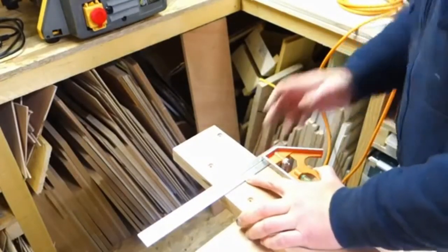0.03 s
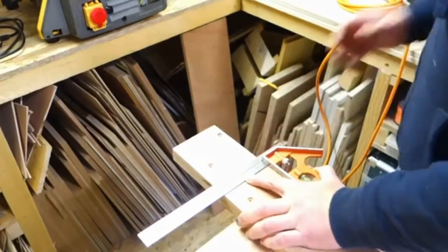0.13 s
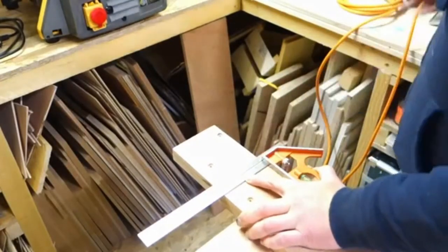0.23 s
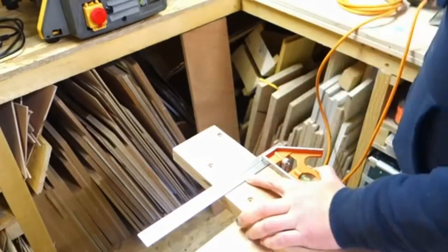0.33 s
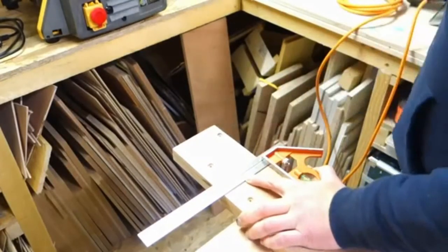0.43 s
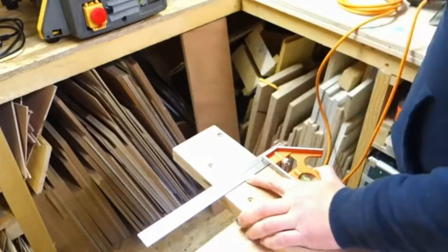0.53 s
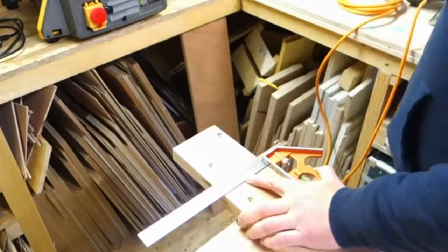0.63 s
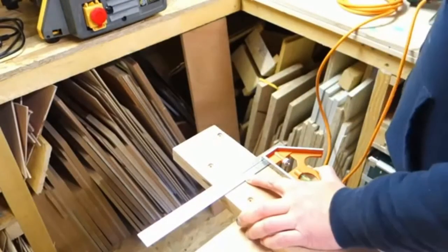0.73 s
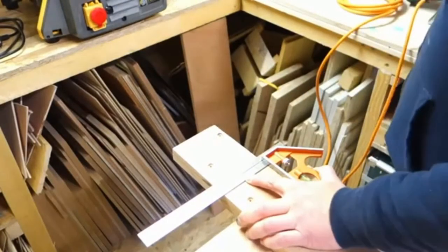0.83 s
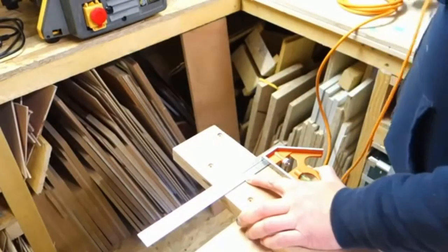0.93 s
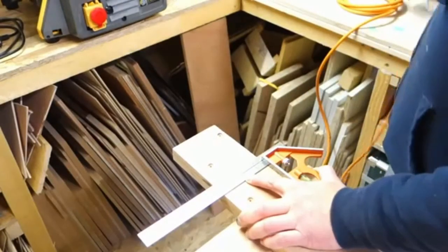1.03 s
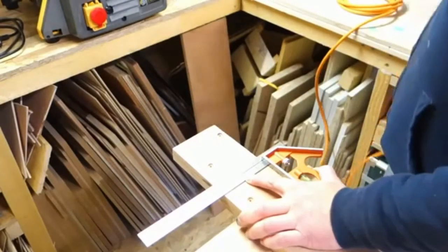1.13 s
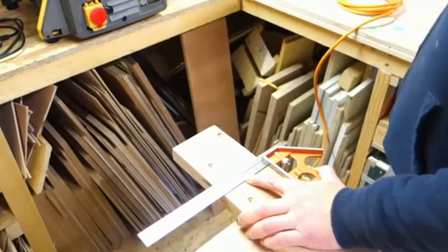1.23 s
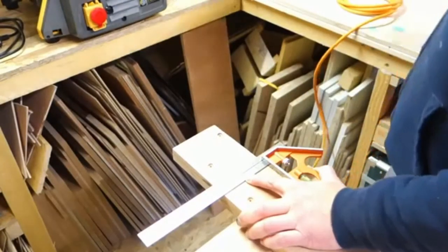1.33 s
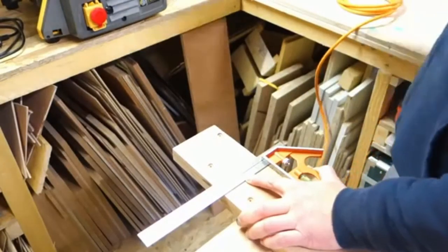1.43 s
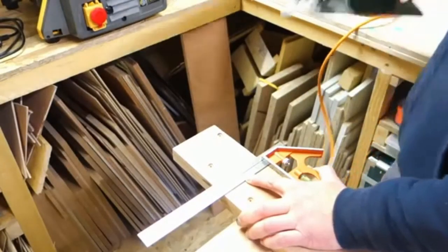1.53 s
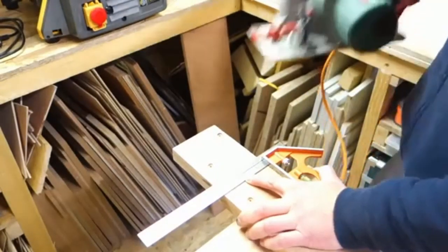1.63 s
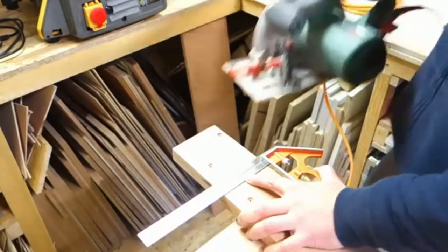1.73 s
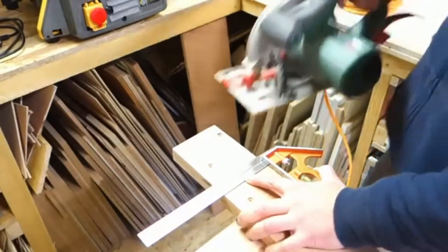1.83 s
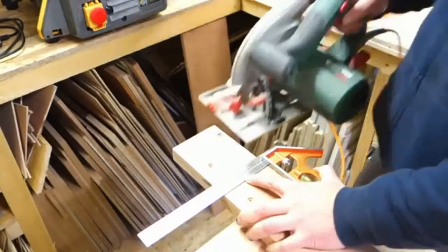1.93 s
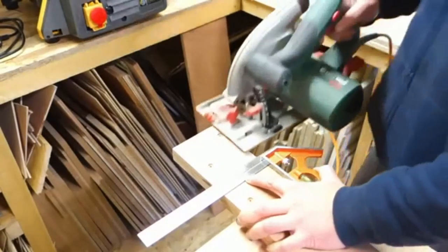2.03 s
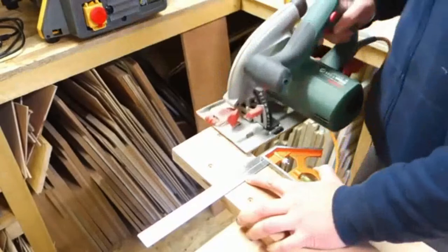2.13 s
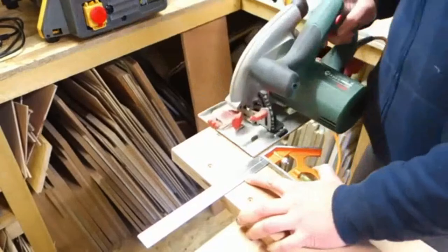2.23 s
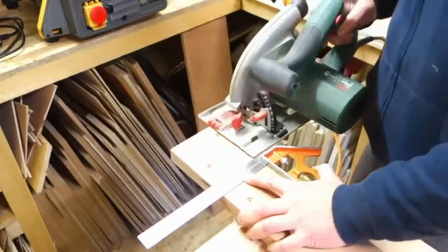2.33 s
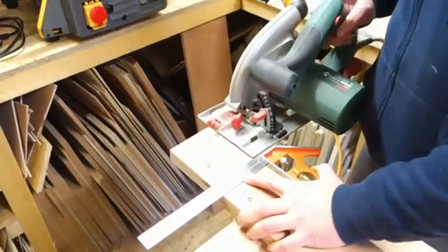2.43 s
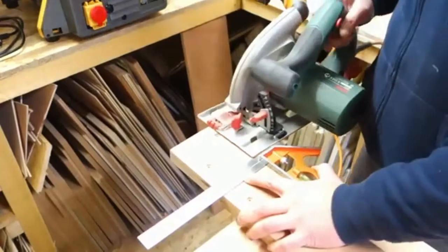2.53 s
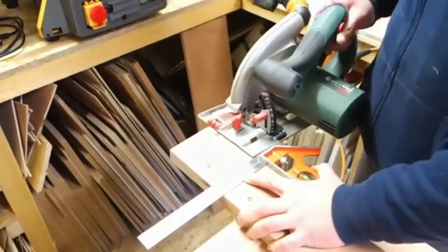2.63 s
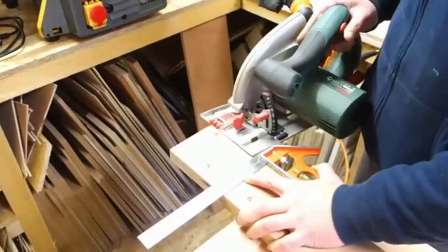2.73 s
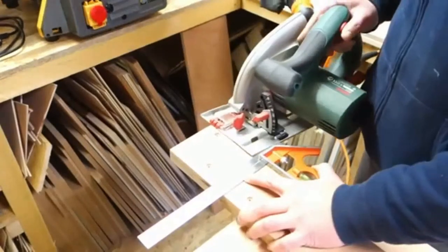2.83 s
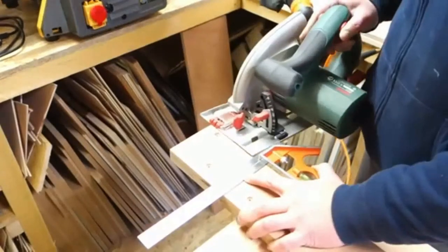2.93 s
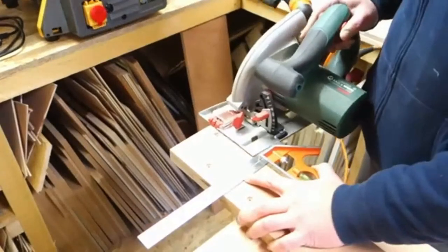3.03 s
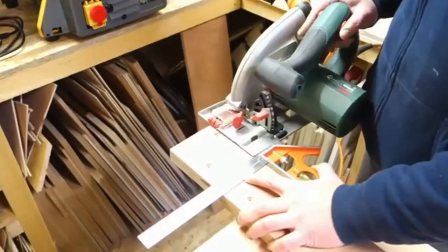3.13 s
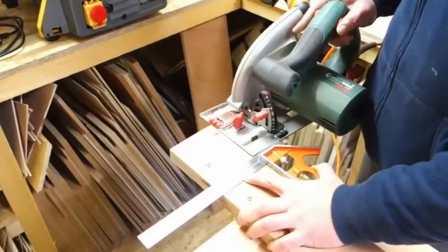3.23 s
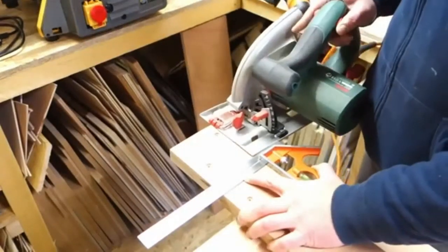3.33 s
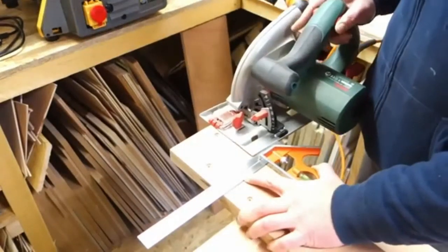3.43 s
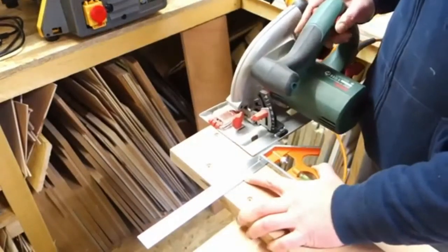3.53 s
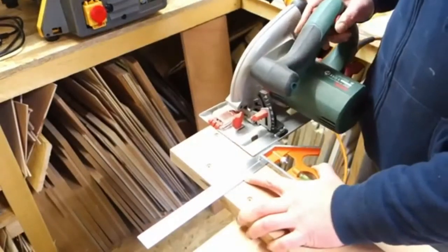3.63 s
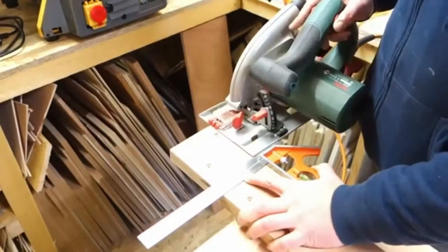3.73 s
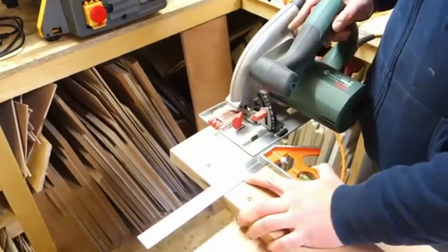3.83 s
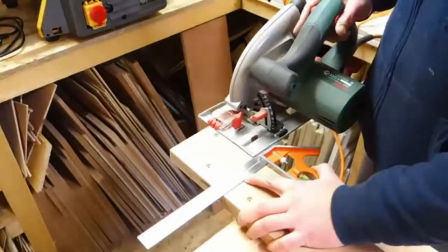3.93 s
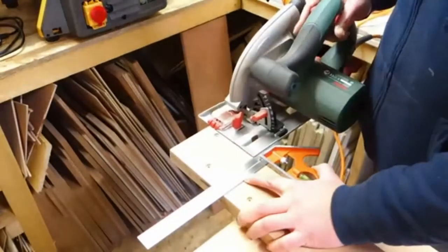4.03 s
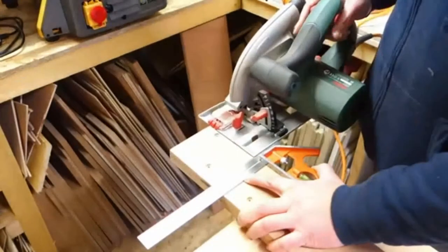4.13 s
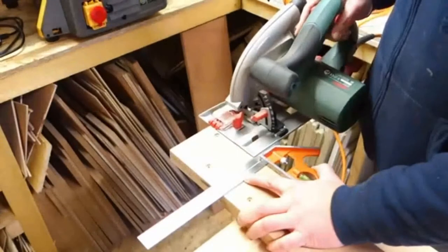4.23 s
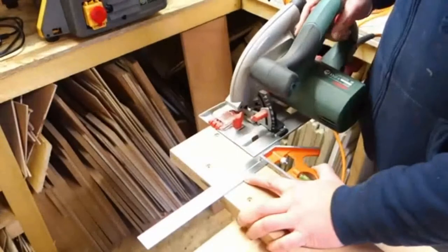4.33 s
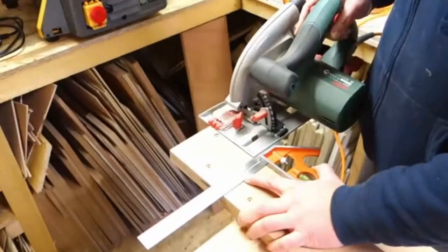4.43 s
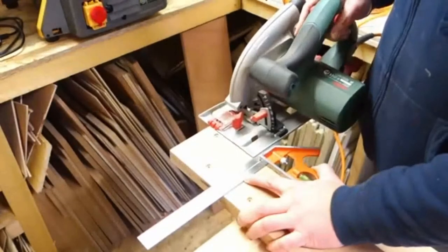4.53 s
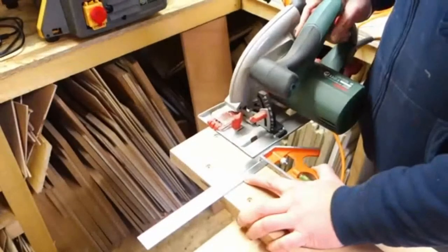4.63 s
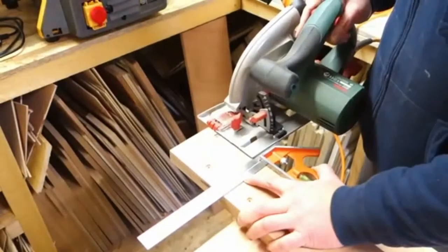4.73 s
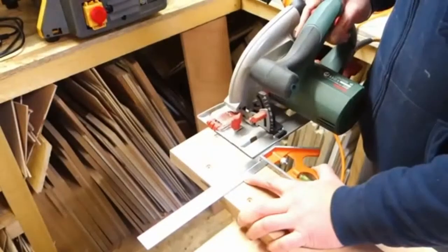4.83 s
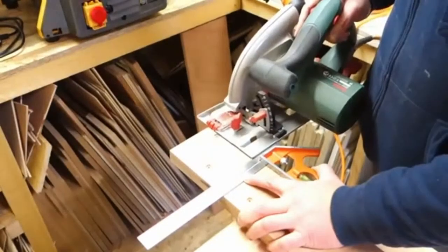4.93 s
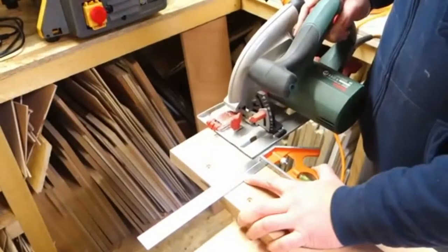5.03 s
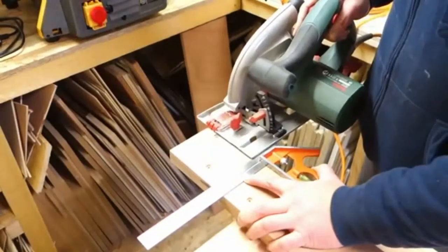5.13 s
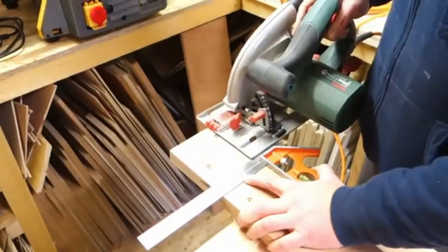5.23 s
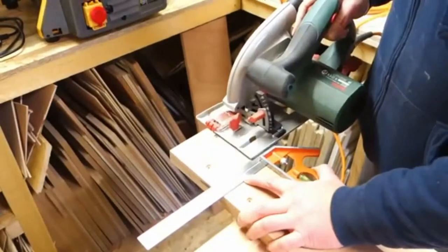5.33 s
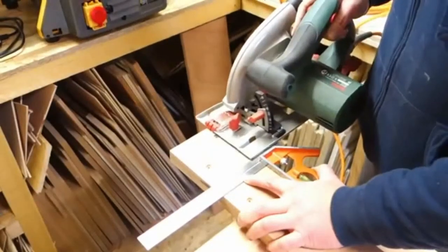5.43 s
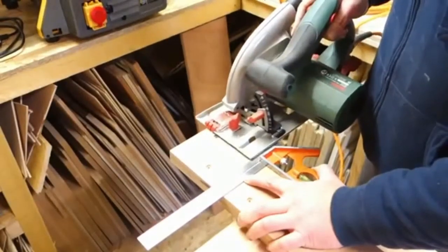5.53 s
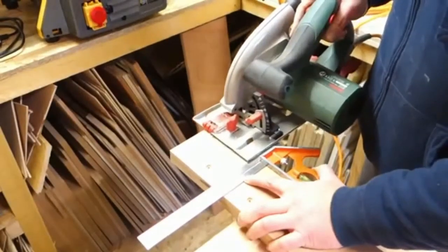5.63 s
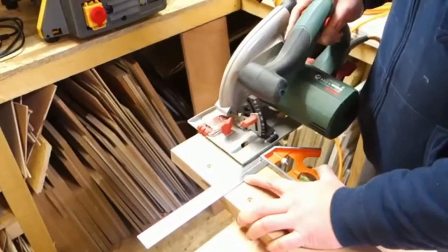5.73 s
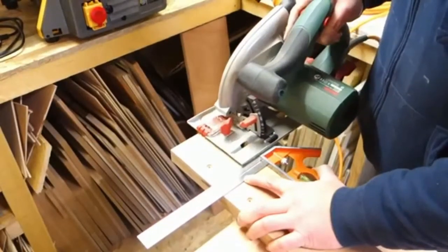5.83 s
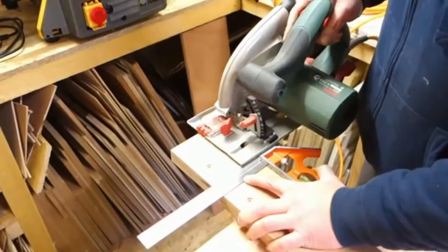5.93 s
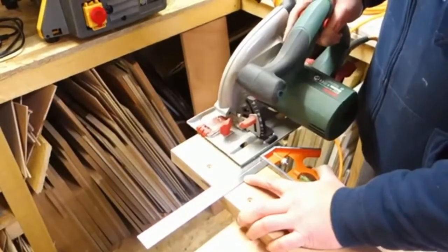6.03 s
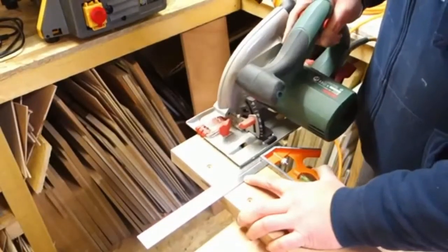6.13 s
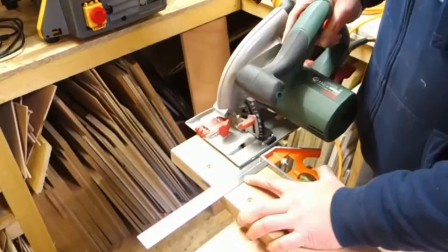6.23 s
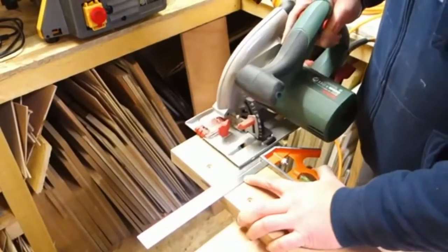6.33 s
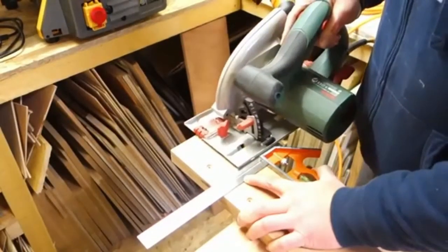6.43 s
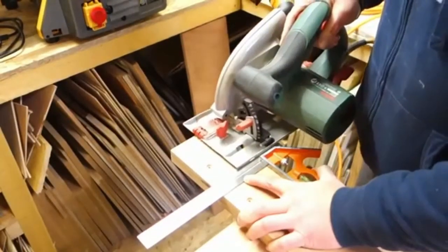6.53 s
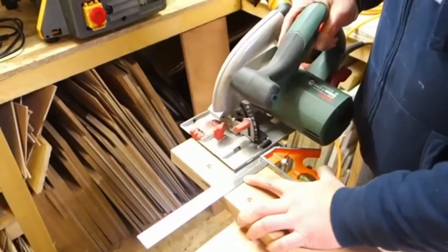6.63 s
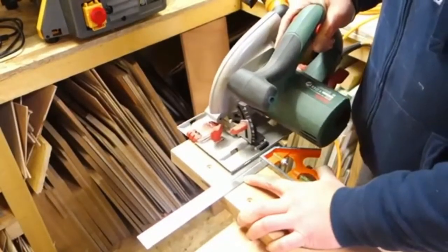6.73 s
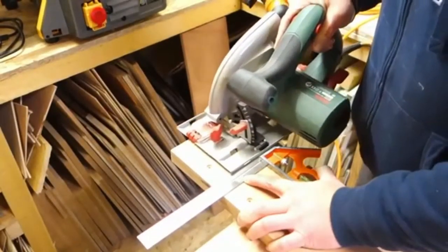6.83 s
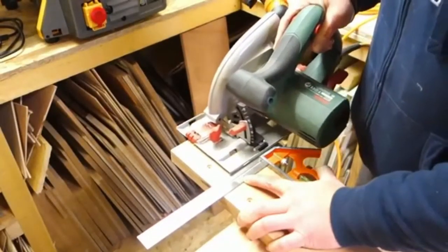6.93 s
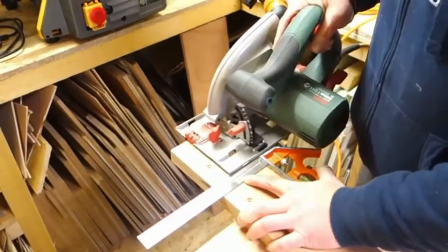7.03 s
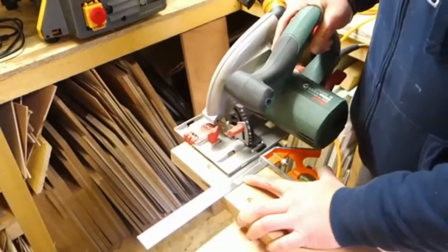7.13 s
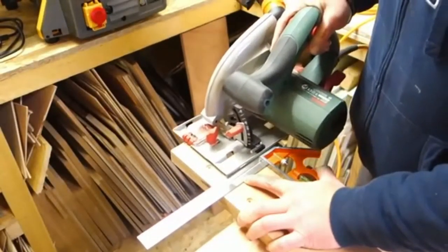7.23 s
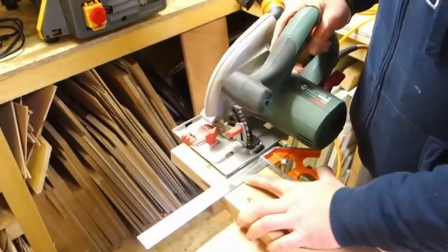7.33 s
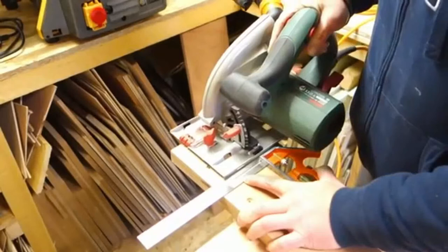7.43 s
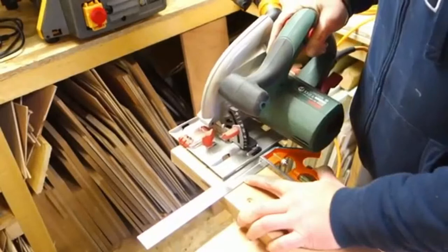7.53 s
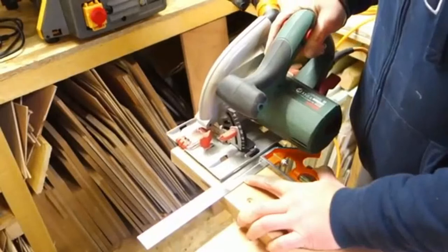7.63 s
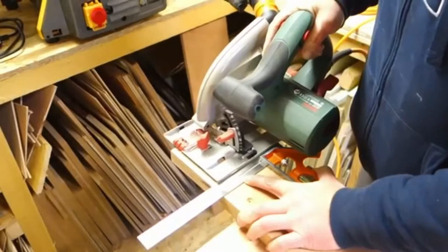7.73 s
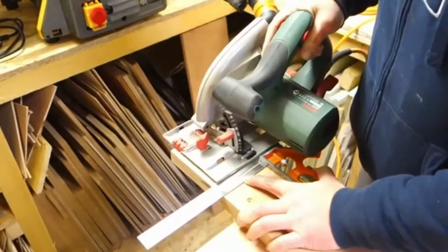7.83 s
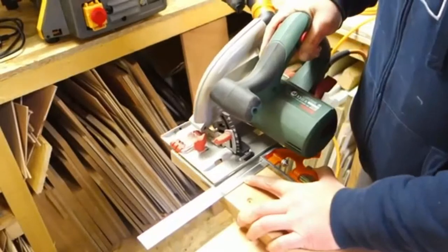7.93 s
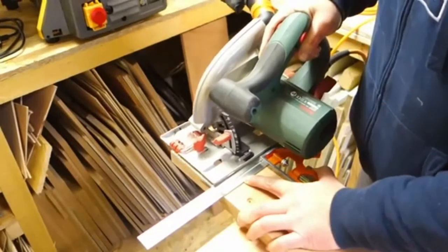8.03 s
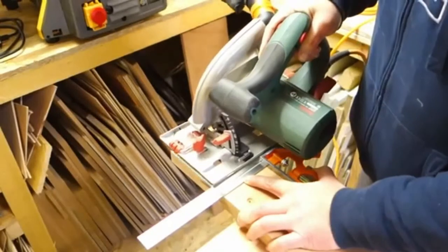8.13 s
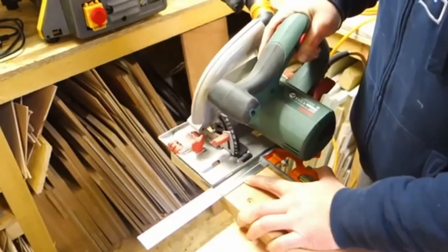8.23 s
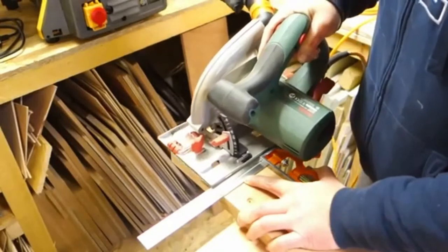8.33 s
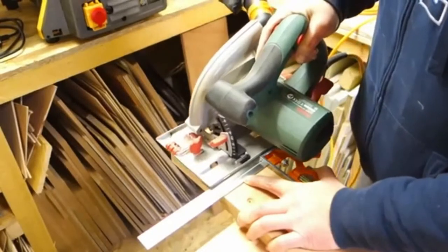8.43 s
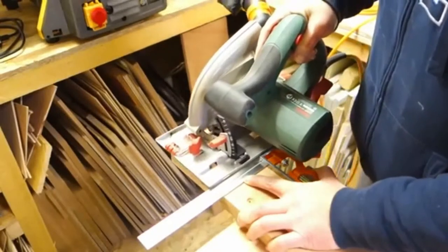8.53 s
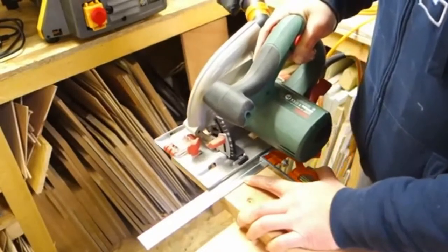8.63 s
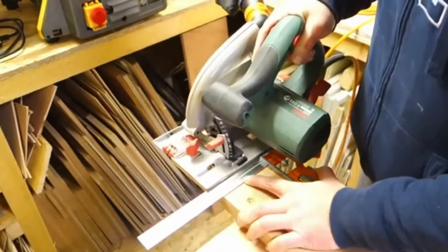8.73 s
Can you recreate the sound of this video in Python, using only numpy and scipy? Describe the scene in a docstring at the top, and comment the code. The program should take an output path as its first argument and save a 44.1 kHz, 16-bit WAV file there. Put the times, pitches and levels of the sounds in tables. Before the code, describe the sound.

Light knocks and rustling as a circular saw is positioned, then it starts abruptly, whines up to speed and cuts wood loudly.

```python
"""In a small workshop a handheld circular saw is picked up, knocked against the bench and set on a board.
Each impact rings the bench's modes, sleeves and cable rustle by friction, and the mount of a two-port
microphone passes on the low shaking. At 3.9 s the motor starts with a jerk and a mains buzz; loose gear
teeth rattle under the torque. As the rotor gathers speed these fade, the gear whine climbs through
the resonances of its case, and fan air and blade teeth roar to the end."""
import sys
import numpy as np
from scipy import signal
from scipy.fft import rfft, irfft
from scipy.io import wavfile
from scipy.ndimage import uniform_filter1d

SR = 44100
rng = np.random.default_rng(int(sys.argv[2]) if len(sys.argv) > 2 else 0)


def generate_wav(sig):
    """Save sig (samples, or channels by samples) to the path in sys.argv[1] as 16-bit PCM at SR."""
    pcm = np.round(np.clip(np.atleast_2d(sig).T, -1, 1) * 32767).astype(np.int16)
    wavfile.write(sys.argv[1], SR, pcm)


N = 388080
TIME = np.arange(N) / SR
FRAMES = np.arange(N // 512 + 5) * 512 / SR  # t/s of the short-time spectra
BINS = np.fft.rfftfreq(2048, 1 / SR)  # their f/Hz


START_S, TOP_HZ = 3.918, 503.5  # trigger time; rotation rate at full speed
# quick and slow stage of the run-up: share of full speed, time constant/s
RUN_UP_STAGES = [(.459, .186), (.428, .599)]
def speed(t=TIME):
    """Exponential approach: the rotor's speed as a share of full speed."""
    return 1 - sum(share * np.exp(-np.maximum(t - START_S, 0) / lag) for share, lag in RUN_UP_STAGES)


# spectrum of the roar: f/Hz, level/dB
ROAR_SPECTRUM = [(30, -28.5), (201, -23.5), (245, -13.5), (330, -18.5), (489, -6.5), (822, -6.5),
                 (1250, -6), (2760, -10), (6080, -11), (11000, -16)]
# peaks and dips of guard and vents: f/Hz, width/Hz, gain/dB
GUARD_RESONANCES = [(420, 40, 4), (640, 50, 3), (712, 60, 8), (820, 60, -5), (920, 40, 2), (1005, 40, 2),
                    (1230, 50, 7.5), (1410, 50, 7.5), (1700, 60, 2), (2020, 70, 4), (2232, 45, 5),
                    (2480, 150, 2), (2700, 150, -3), (2930, 120, 2), (4255, 70, 5), (4380, 350, 4),
                    (5110, 60, 3), (6100, 500, -2.5), (6550, 200, 2.5), (7350, 450, 3)]
# lift of the blade's hiss band: t/s, gain/dB
BLADE_HISS_LIFT = [(3.918, 1), (5.0, 0), (5.5, 2.5), (6.0, 5), (6.5, 5.5), (7.0, 2), (8.8, 3)]
# likeness of left and right in roar and rattle: f/Hz, correlation
SAW_COHERENCE = [(60, 0.11), (170, 0.69), (480, 0.7), (1370, 0.89), (3900, 0.45), (11100, 0.59)]
def roar(turns):
    """Aerodynamic noise of fan and teeth grows as a power of speed and pulses with rotor and blade."""
    colour = read(ROAR_SPECTRUM, BINS) + sum(db * bump(hz, width) for hz, width, db in GUARD_RESONANCES)
    tilt_db_per_octave = 1.5 + .25 * 20 * np.log10(speed(FRAMES))
    tilt = np.outer(np.log2(BINS / 2000 + .24), tilt_db_per_octave)
    blade_hiss = np.outer(bump(hz=8030, width=680), curve(BLADE_HISS_LIFT, FRAMES))
    air = noise(colour[:, None] + tilt + blade_hiss, read(SAW_COHERENCE, BINS)[:, None], patchy_db=1.1)
    pulsing = 1 + .04 * np.cos(2 * np.pi * turns) + .05 * np.cos(2 * np.pi * turns * PINION / WHEEL)
    return air * pulsing * gain_of(-11.5) * speed() ** 1.45


PINION, WHEEL = 5, 26  # tooth counts
# modulation by the uneven wheel: offset from the mesh tone/blade rotation rate, level/dB
MESH_SIDEBANDS = [(-2, -15), (-1, -5), (0, 0), (1, -7), (2, -12)]
# how well a mesh tone radiates from the saw: f/Hz, gain/dB
MESH_RADIATION = [(300, -46), (1200, -36), (1500, -23), (2000, -23), (2170, -22), (2380, -28.5),
                  (2460, -37.5), (2700, -30), (3000, -20), (3400, -20.5), (3600, -27), (5050, -43),
                  (5400, -22), (5750, -16), (6100, -32), (6600, -39)]
# gear case: f/Hz, width/Hz, gain/dB
CASE_RESONANCES = [(1360, 116, 2.5), (2036, 21, 10.5), (2220, 26, 3), (3100, 210, -8), (3400, 110, -16),
                   (6020, 94, 3)]
def gear_whine(turns):
    """Periodic tooth meshing gives three harmonics with sidebands, lifted by resonance of the case."""
    blade_turns = turns * PINION / WHEEL
    mesh = np.zeros(N)
    for k, harmonic_db in enumerate((0, -4.5, -10), 1):
        level_db = harmonic_db + read(MESH_RADIATION, k * PINION * TOP_HZ * speed())
        for offset, side_db in MESH_SIDEBANDS:
            phase = k * PINION * turns + offset * blade_turns + .07 * k ** 1.5 * drift(120) + rng.random()
            mesh += gain_of(level_db + side_db + 2.5 * drift(70)) * np.sin(2 * np.pi * phase)
    return mesh + sum(gain_of(db) * signal.lfilter(*signal.iirpeak(hz, hz / width, SR), mesh)
                      for hz, width, db in CASE_RESONANCES)


# hums at the rotor's rate, twice that, and the blade's rate: level/dB, fade start/s, length/s, change/dB
ROTOR_ORDER = (-35, 6.8, 0.5, -14)
DOUBLE_ORDER = (-31, 5.5, .5, -6.5)
BLADE_ORDER = (-50, 5.5, 1.5, -10)
def unbalance(turns):
    """Rotating unbalance: hums grow as a power of speed and die down as the work damps the saw."""
    orders = ((turns, 2.3, ROTOR_ORDER), (2 * turns, 5.3, DOUBLE_ORDER),
              (turns * PINION / WHEEL, 1.6, BLADE_ORDER))
    hums = np.zeros(N)
    for cycles, exponent, (db, start, length, fade_db) in orders:
        rms = gain_of(db + fade_db * ramp(start, length) + 2.5 * drift(30)) * speed() ** exponent
        hums += np.sqrt(2) * rms * np.sin(2 * np.pi * (cycles + .045 * drift(30)))
    return hums


FULL_TORQUE_GAP = .57  # share of full speed still missing when the torque leaves its limit
# broad spectrum of the tooth blows: f/Hz, level/dB
RATTLE_SPECTRUM = [(40, -46), (93, -18), (400, -18), (570, -9), (1600, -8), (1890, -9), (2690, -14),
                   (11000, -28)]
# loaded housing: f/Hz, width/Hz, level/dB
HOUSING_MODES = [(581, 24, 1), (862, 18, 4.5), (1423, 17, -6), (1883, 56, 0), (2120, 37, 2),
                 (2050, 370, -12)]
def rattle(turns):
    """Backlash: loose tooth blows ring the housing, as noise that pulses per tooth and follows torque."""
    rings = sum(gain_of(db) * bump(hz, width) for hz, width, db in HOUSING_MODES)
    colour = 20 * np.log10(gain_of(read(RATTLE_SPECTRUM, BINS)) + rings)
    bunching = 1 + .5 * np.cos(2 * np.pi * PINION * turns) + .088 * drift(150)
    torque = np.minimum((1 - speed()) / FULL_TORQUE_GAP, 1)
    strength = gain_of(-11.5) * torque ** 1.97 * (.48 + .48 * ramp(START_S, .02))
    return noise(colour[:, None], read(SAW_COHERENCE, BINS)[:, None], patchy_db=2.1) * bunching * strength


BUZZ_HZ = 100.8
def buzz():
    """Magnetic force shakes the windings at twice the mains rate, fading with the starting current."""
    amplitude = gain_of(-27.5 + 3 * drift(40)) * (1 - speed()) ** 1.47
    return amplitude * np.sin(2 * np.pi * (BUZZ_HZ * TIME + .08 * drift(40)))


CONTACT_RISE_S = .0017
# bench, board and base plate: f/Hz, level/dB, T60/s
BENCH_MODES = [(155, -0.5, 0.23), (197, -1, 0.055), (241, -2, 0.066), (354, -6, 0.063), (393, 3, 0.04),
               (551, -1, 0.088), (710, 0, 0.015), (878, 5.5, 0.032), (1010, 2, 0.025), (1230, 14.5, 0.015),
               (1426, 0, 0.047), (1630, 12, 0.008), (1875, 2, 0.037), (2090, 0, 0.09), (2330, 8, 0.0076)]
def knock(hz, focus_db, t60, clack_db):
    """Modal response: a rough, dying contact rings the modes near its pitch most, and itself clacks."""
    t = np.arange(round(.3 * SR)) / SR
    contact = rng.standard_normal(len(t)) * (1 - np.exp(-t / CONTACT_RISE_S))
    contact *= gain_of(-60 * t / max(t60, .01))
    modes = sum(gain_of(db - focus_db * abs(np.log2(f / hz)) - 60 * t / ring) * np.sin(2 * np.pi * f * t)
                for f, db, ring in BENCH_MODES)
    body = signal.fftconvolve(contact, modes)[:len(t)]
    clack = signal.lfilter([1, -1], [1, -1.55, .6], contact)
    return body / abs(body).max() + gain_of(clack_db) * clack / abs(clack).max()


# knocks: t/s, level/dB, struck f/Hz, fall of modes away from f/(dB per octave), contact T60/s, clack/dB
IMPACTS = [(.303, -18, 800, 10, 0.086, -12), (.33, -28.5, 496, 15, 0.067, -21),
           (0.822, -29, 438, 8, .17, -8.5), (1.225, -41, 2300, 9, 0.083, 9),
           (1.337, -21.5, 1400, 22, .1, -26), (1.368, -14.5, 870, 52, 0.096, -21),
           (1.656, -21.5, 560, 10, 0.17, -19), (1.845, -23.5, 416, 5.5, .18, -8),
           (1.87, -26, 1300, 8, 0.054, -23), (2.126, -29.5, 386, 13, 0.05, -24),
           (2.18, -29, 2050, 45, 0.039, -5.5), (2.198, -25, 700, 7, 0.11, -20),
           (2.383, -8.5, 890, 16, .06, -13), (2.42, -21, 245, 21, 0.095, -15),
           (2.439, -18, 230, 16, .14, -38), (2.528, -27.5, 600, 12, 0.093, -17),
           (2.654, -29, 910, 14, .1, -14), (2.728, -37, 2080, 50, 0.035, -6),
           (2.738, -29, 350, 7, .079, -19), (3.052, -37, 700, 1, .055, -8), (3.154, -31, 450, 17, .16, -8),
           (3.194, -29, 440, 22, 0.098, -21), (3.271, -28, 700, 5, .04, -15),
           (3.324, -36, 550, 14, .08, -18), (3.434, -33, 250, 18, .12, -24),
           (3.554, -34, 420, 20, .05, -20), (3.658, -32, 378, 18, .07, -18)]
# jerk of the starting motor: the same columns without t; its contact takes the shortest T60, 0.01 s
START_JERK = (-13, 598, 10.5, -0.1, 4)
# the saw's path from shelf to board: t/s, left minus right/dB
SAW_PATH = [(.3, -1), (.9, -4), (1.35, -4), (1.8, 3), (2.3, 0), (2.45, 1.5), (3.0, 0)]
def knocks():
    """Level-difference panning: each impact sounds from where the saw is at that moment."""
    mix = np.zeros((2, N))
    for s, db, *stroke in IMPACTS + [(START_S, *START_JERK)]:
        sound = gain_of(db + np.array([[.5], [-.5]]) * curve(SAW_PATH, s)) * knock(*stroke)
        start = round(s * SR)
        mix[:, start:start + sound.shape[1]] += sound
    return mix


# sleeves, cable and plate sliding: t/s, length/s, hiss level/dB, scrape level/dB
STROKES = [(0, 0.22, -51, -47), (0.28, 0.093, -50, -43), (.73, .17, -55, -59), (0.97, 0.073, -62, -46.5),
           (1.316, 0.088, -44, -46), (1.402, 0.099, -50.5, -49), (1.553, 0.15, -46, -37.5),
           (1.809, 0.13, -41.5, -36.5), (1.964, 0.075, -51, -47), (2.11, 0.18, -56, -40),
           (2.277, 0.26, -50.5, -48), (2.551, .14, -43.5, -47), (2.772, 0.073, -49.5, -51),
           (2.85, 0.37, -51, -53), (3.13, 0.31, -59, -46.5), (3.41, 0.55, -75, -49)]
# cloth hiss: f/Hz, level/dB
CLOTH_SPECTRUM = [(900, -30), (1500, -12), (3000, -10.5), (8400, -15), (11000, -22)]
# lower scrape: f/Hz, level/dB
SCRAPE_SPECTRUM = [(90, -25), (150, -16), (420, -8.5), (700, -10.5), (1300, -22), (2200, -21), (4000, -54)]
def rustle():
    """Sliding friction: each stroke swells and fades as clumpy hiss and scrape."""
    hiss_gain, scrape_gain = np.zeros((2, N))
    for s, length, hiss_db, scrape_db in STROKES:
        stroke = np.sin(np.pi * ramp(s, length)) ** .56
        hiss_gain += gain_of(hiss_db) * stroke
        scrape_gain += gain_of(scrape_db) * stroke
    hiss = noise(read(CLOTH_SPECTRUM, BINS)[:, None], coherence=.098, patchy_db=1.8)
    hiss *= gain_of(.86 * drift(100))
    scrape = noise(read(SCRAPE_SPECTRUM, BINS)[:, None], coherence=.6, patchy_db=3)
    scrape *= gain_of(2 * drift(50))
    return hiss * hiss_gain + scrape * scrape_gain


JOLT_RISE_S, SWAY_HZ = .084, (12.2, 23.8)
# jolts through the microphone mount: t/s, hold/s, sway level/dB, thud level/dB
MOUNT_JOLTS = [(0, .05, -27, -52), (1.93, .02, -24, -59), (2.17, 0.13, -16.5, -32.5),
               (3.295, .02, -33, -39), (3.47, .03, -25.5, -46), (3.99, 0.15, -54, -33)]
# thuds in the mount: f/Hz, level/dB
THUD_SPECTRUM = [(30, -8.5), (60, -2), (115, -3), (167, -16.5), (300, -21.5), (500, -57)]
def mount_shaking():
    """Structure-borne sound: jolts reach the microphone as sway and thuds that swell, hold and decay."""
    def envelope(levels_db, fall_db_per_s, rest_db):
        return gain_of(rest_db) + sum(
            gain_of(db - fall_db_per_s * np.maximum(TIME - s - hold, 0))
            * ramp(s - JOLT_RISE_S, JOLT_RISE_S) ** 2 for (s, hold, *_), db in zip(MOUNT_JOLTS, levels_db))

    sway_db, thud_db = np.transpose(MOUNT_JOLTS)[2:]
    band = signal.butter(3, SWAY_HZ, "band", fs=SR, output="sos")
    across, along = signal.sosfilt(band, rng.standard_normal((2, N)))
    sway = unit_rms(np.array([across, -across]) + .15 * along)  # the ports feel it in opposite sense
    thud = noise(read(THUD_SPECTRUM, BINS)[:, None], coherence=.3, patchy_db=3.3)
    return (sway * envelope(sway_db, fall_db_per_s=19, rest_db=-58)
            + thud * envelope(thud_db, fall_db_per_s=41, rest_db=-52.5))


# a low hum: t/s, level/dB
HUM_LEVEL = [(0, -46.5), (2.1, -49.5), (2.4, -61), (3.9, -62)]
def low_hum():
    """Narrow-band noise is heard as a wavering tone."""
    colour = 40 * np.log10(bump(hz=200, width=14))
    return noise(colour[:, None], coherence=.7, patchy_db=2.1) * gain_of(curve(HUM_LEVEL))


# background of the workshop: f/Hz, level/dB
ROOM_SPECTRUM = [(35, -27), (60, -19), (100, 7.5), (157, -17), (230, -1.5), (1200, -7), (1700, -17),
                 (11000, -27.5)]
def room_tone():
    """Stationary noise forms a faint, low floor."""
    return noise(read(ROOM_SPECTRUM, BINS)[:, None], coherence=.49, patchy_db=.48) * gain_of(-46.5)


# reverberation time of the workshop: f/Hz, T60/s
SHOP_DECAY = [(150, 0.091), (1000, 0.13), (4000, 0.17), (10000, 0.045)]
def reverberation(x):
    """Diffuse reflection: sparse echoes of random sign, each band decaying at its own rate."""
    taps = np.zeros((2, SR // 2))
    slots = np.arange(120, SR // 2 - 20, 20)
    delays = slots + rng.integers(0, 20, (2, len(slots)))
    np.put_along_axis(taps, delays, rng.choice([-1., 1.], delays.shape), 1)
    hz, t, spectra = signal.stft(taps, SR, nperseg=256)
    tail = signal.istft(spectra * gain_of(-60 * t / read(SHOP_DECAY, hz)[:, None]), SR, nperseg=256)[1]
    return signal.oaconvolve(x[None], tail / np.linalg.norm(tail[0]), axes=1)[:, :N]


def noise(colour_db, coherence, patchy_db):
    """Spectral synthesis: stereo noise of rms 1 with drifting patches; colour is bins x (1 or frames)."""
    a, b, c, d, patches = rng.standard_normal((len(FRAMES), len(BINS), 5), dtype=np.float32).T
    patches = unit_rms(uniform_filter1d(uniform_filter1d(patches, 9, 0), 9, 1))
    size = gain_of(colour_db)
    size = size / np.sqrt((size ** 2).mean(0)) * gain_of(patchy_db * patches)
    left = a + 1j * b
    right = coherence * left + np.sqrt(1 - coherence ** 2) * (c + 1j * d)
    return unit_rms(signal.istft(np.array([left, right]) * size, nperseg=2048, noverlap=1536)[1][:, :N])


def drift(top_hz):
    """Superposed sines of random phase: a fluctuation of rms 1."""
    t = TIME[::64]
    rates = np.geomspace(top_hz / 8, top_hz, 12)
    waves = sum(np.sin(2 * np.pi * (f * t + rng.random())) / np.sqrt(f) for f in rates)
    return np.interp(TIME, t, unit_rms(waves))


def bump(hz, width):
    """Resonance curve of height 1 over the bins."""
    return 1 / (1 + (2 * (BINS - hz) / width) ** 2)


def read(points, hz):
    """Interpolation of a spectrum in log frequency."""
    f, value = np.transpose(points)
    return np.interp(np.log(hz + 1), np.log(f + 1), value)


def curve(points, t=TIME):
    """Linear interpolation in time."""
    return np.interp(t, *np.transpose(points))


def ramp(start, length):
    """Linear rise from 0 to 1."""
    return np.clip((TIME - start) / length, 0, 1)


def gain_of(db):
    """Level to amplitude ratio."""
    return 10 ** (np.asarray(db) / 20)


def unit_rms(x):
    """Normalisation to rms 1."""
    return x / np.sqrt(np.mean(x ** 2) + 1e-20)


# balance of the running saw: f/Hz, left minus right/dB
SAW_BALANCE = [(60, 2.5), (220, -2), (810, 0.5), (3000, 0.5), (11100, 0.0)]
def scene():
    """Superposition of saw, knocks, handling and background; the saw's tones and knocks reverberate."""
    turns = np.cumsum(TOP_HZ * speed()) / SR
    running = ramp(START_S, .0035)
    blows = knocks()
    tones = (gear_whine(turns) + unbalance(turns)) * running
    saw = gain_of(2) * tones + gain_of(-3) * reverberation(tones)
    saw += (rattle(turns) + roar(turns) + buzz()) * running
    balance = gain_of(np.outer([.5, -.5], read(SAW_BALANCE, np.fft.rfftfreq(N, 1 / SR))))
    saw = irfft(rfft(saw) * balance, N)
    blows += gain_of(-4) * reverberation(blows.mean(0))
    return saw + blows + rustle() + mount_shaking() + low_hum() + room_tone()


EDGE_HZ = 10640
def record(dry):
    """Soft saturation rounds the highest peaks; a low-pass filter then limits the band."""
    excess = np.maximum(abs(dry) - .6, 0)
    rounded = dry - np.sign(dry) * (excess - .25 * np.tanh(excess / .25))
    lowpass = signal.firwin(1023, EDGE_HZ, window=("kaiser", 10), fs=SR)
    return signal.oaconvolve(rounded, lowpass[None], "same")


dry = scene()
out = record(dry)
generate_wav(out)
```